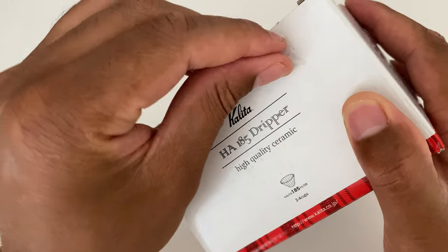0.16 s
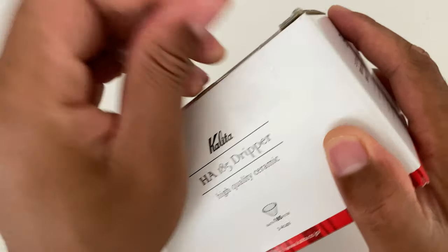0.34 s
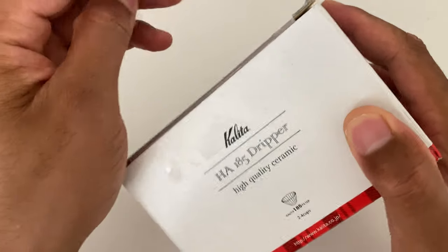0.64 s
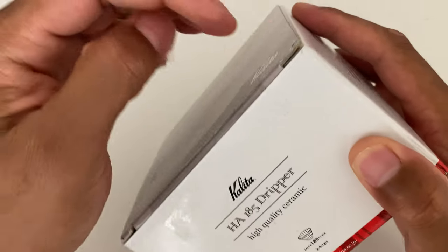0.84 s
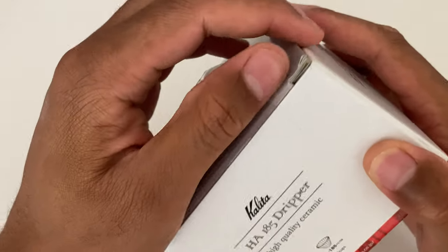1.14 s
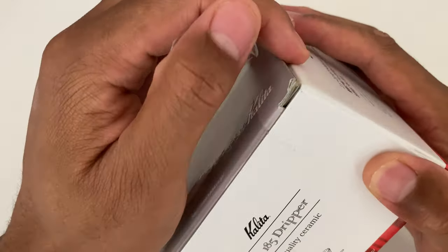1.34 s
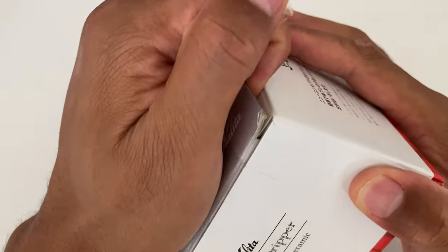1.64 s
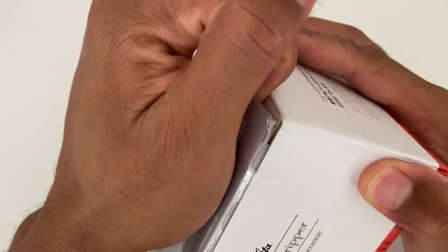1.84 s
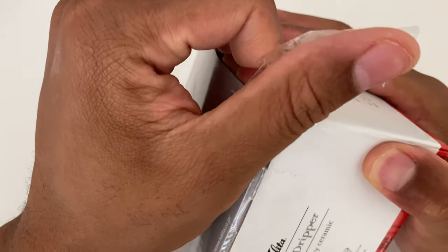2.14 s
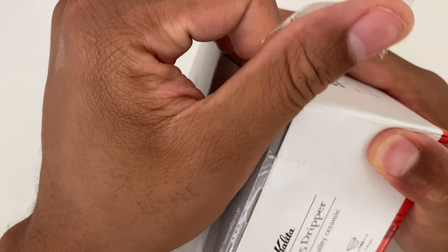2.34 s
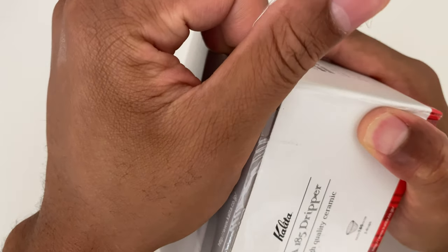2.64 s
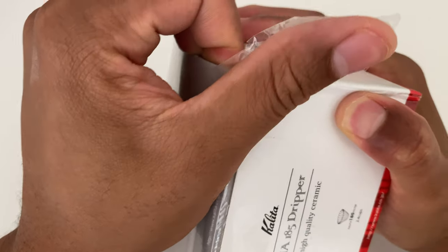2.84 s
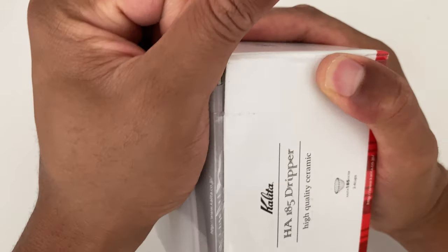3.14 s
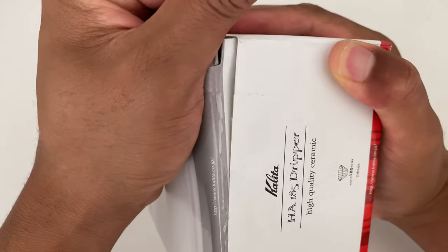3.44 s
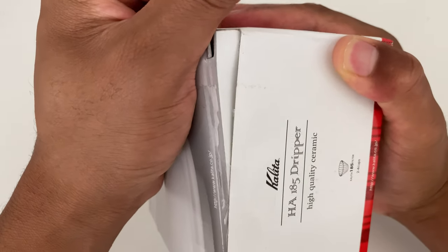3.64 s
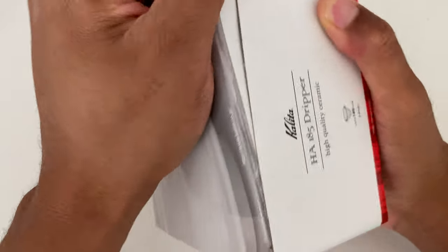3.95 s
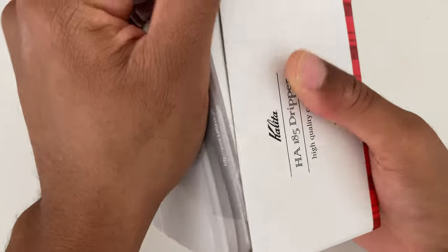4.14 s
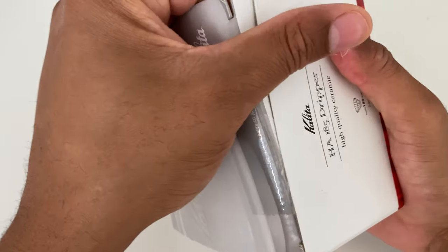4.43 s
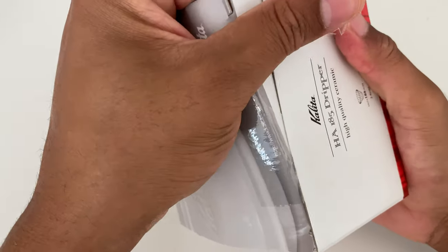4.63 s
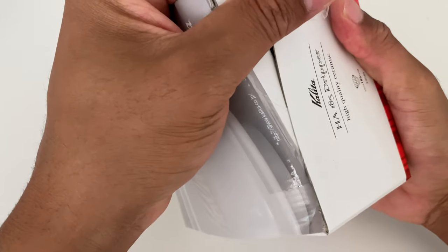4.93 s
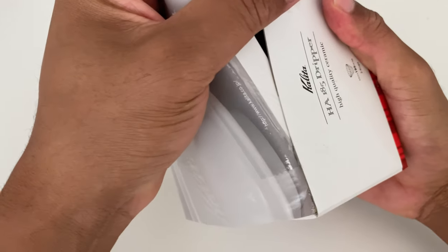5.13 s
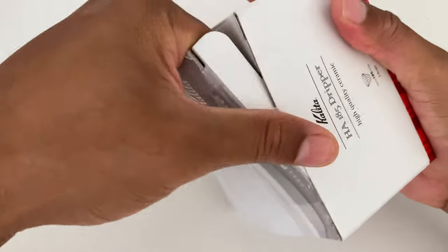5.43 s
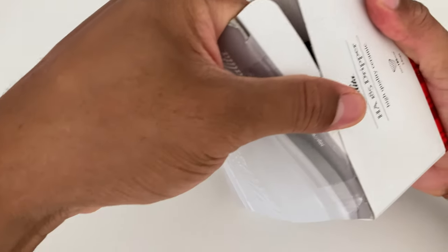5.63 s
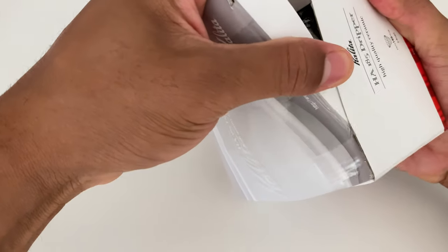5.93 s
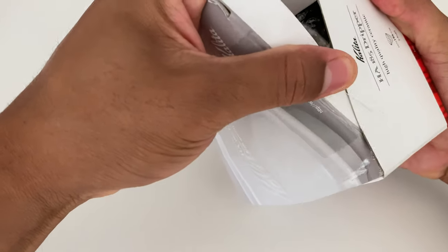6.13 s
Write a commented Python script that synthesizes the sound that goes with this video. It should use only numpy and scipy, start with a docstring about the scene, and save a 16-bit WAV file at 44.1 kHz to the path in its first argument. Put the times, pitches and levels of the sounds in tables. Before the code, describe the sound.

Close stereo phone pickup in a quiet room with faint low air and a light, bright tail. From 0 to 0.5 s, small sticky ticks and a swish of fingers on glossy film lead to a sharp snap at 0.4. A brief film rustle comes near 0.7, then isolated bright snaps at 0.9 and 1.2 among near silence and faint hollow bumps. Around 1.8 to 2.0 muffled cardboard taps gather, with one small ceramic clink near 3 kHz at 1.85. From 2.1 to 3.3 rapid boxy knocks and rubbing grow denser and louder. At 3.36 comes the loudest event, a hard crack and hollow thump, then dry scraping until 3.8, with a knock at 3.75. Knocks at 4.4 and crisp glue crackles from 4.65 to 4.95 end in a strong thump. Sparser pops follow at 5.4, 5.5 and 5.9, with soft rustle fading to about 6.3.

```python
"""Opening a small cardboard box, close to the phone

Hands peel a sticky seal off a small box and pry its flap open, close to a phone in a quiet room.
Slips of the flaps ring the hollow box as decaying modes, and glue and film snap in short bright noise bursts.
Skin rubs the card as stick-slip noise, and a ceramic piece inside clinks once as a cluster of modes around 3 kHz.
A noise tail makes the room, steady low noise its still air, and two microphone ports the stereo.
"""
import sys
import numpy as np
from scipy import signal
from scipy.fft import rfft, irfft
from scipy.io import wavfile
from scipy.ndimage import uniform_filter1d

SR = 44100
rng = np.random.default_rng(int(sys.argv[2]) if len(sys.argv) > 2 else 0)


def transcribe(signal):
    """Save signal, clipped to [-1, 1], as a 16-bit WAV file at the path in sys.argv[1]."""
    frames = np.atleast_2d(signal).T
    limited = np.clip(frames, -1, 1)
    pcm = np.round(limited * 32767).astype(np.int16)
    wavfile.write(sys.argv[1], SR, pcm)


N = 276948

# fingers creeping on the card: (time [s], box rumble [dB], card scrape [dB])
RUB_LEVELS = [(0, -70, -68.5), (.17, -54, -62), (.25, -65.5, -70.5), (.4, -46, -50), (.51, -49.5, -55),
              (.62, -54.5, -58.5), (.72, -61.5, -61), (.89, -63, -80), (1.04, -65, -70),
              (1.09, -55.5, -66.5), (1.3, -52.5, -74), (1.46, -59, -73), (1.52, -43, -50.5),
              (1.57, -51.5, -63), (1.84, -48.5, -61.5), (1.87, -51.5, -54), (2.0, -45, -62),
              (2.14, -48.5, -64.5), (2.39, -46.5, -59.5), (2.55, -52, -61.5), (2.59, -36.5, -57),
              (2.65, -50.5, -75), (2.72, -55, -55), (2.75, -36.5, -53.5), (2.9, -47, -55.5),
              (2.99, -31, -48), (3.08, -46, -61), (3.17, -39, -55.5), (3.3, -48, -66), (3.37, -39.5, -39.5),
              (3.52, -43, -40), (3.6, -41, -47), (3.66, -48, -48), (3.77, -40, -44), (3.85, -52.5, -61),
              (4.01, -39.5, -52), (4.1, -50.5, -64), (4.33, -53, -60), (4.42, -48.5, -54),
              (4.44, -39.5, -47), (4.61, -42.5, -59.5), (4.71, -45.5, -50), (4.96, -39.5, -47),
              (5.1, -42, -52.5), (5.24, -51.5, -63), (5.42, -42.5, -49.5), (5.68, -52, -60.5),
              (5.89, -51, -56.5), (5.91, -38, -50), (5.95, -42, -74), (6.13, -52, -64.5),
              (6.28, -53.5, -54.5)]
# modes of the hollow box: (frequency [Hz], level [dB])
BOX_MODES = [(165, -2), (250, -2), (310, 0), (362, 3), (425, 2), (503, 3), (590, -6), (690, -2), (780, -3),
             (1020, -2), (1150, 0), (1480, -1)]
# spectrum of cracking card: (frequency [Hz], level [dB per Hz])
CRACK_SPECTRUM = [(700, 5), (1200, 4.5), (2000, 1.5), (3000, -4.5), (5000, -14.5), (7000, -21.5)]
# spectrum of the glossy film and its glue: (frequency [Hz], level [dB per Hz])
FILM_SPECTRUM = [(5000, -5.5), (7000, -6.5), (8500, -0.5), (10500, 3), (12500, -1.5), (14000, 3),
                 (15500, -6), (16500, 0.5)]


def undb(db):
    """Gain of a level in dB."""
    return 10 ** (np.asarray(db) / 20)


def unit(x):
    """Scaled to rms 1."""
    return x / np.sqrt(np.mean(x ** 2))


def colour(x, points):
    """Filter by (Hz, dB) points, falling a further 9.8 dB an octave outside them."""
    hz, db = np.transpose(points)
    octave = np.log2(np.maximum(np.fft.rfftfreq(x.shape[-1], 1 / SR), 1))
    below = np.maximum(np.log2(hz[0]) - octave, 0)
    above = np.maximum(octave - np.log2(hz[-1]), 0)
    gain_db = np.interp(octave, np.log2(hz), db) - 9.8 * (below + above)
    return irfft(rfft(x) * undb(gain_db), x.shape[-1])


def walk(rate):
    """Random levels drawn at a rate in Hz with straight slews between them; spread near 1."""
    hold = int(SR / rate)
    steps = np.repeat(rng.standard_normal(N // hold + 1), hold)
    return 1.2 * uniform_filter1d(steps, hold)[:N]


def grains(rate, scatter_db, smooth):
    """Stick-slip: scattered clicks of very uneven size over a share of smooth noise."""
    struck = rng.random(N) < rate / SR
    size = undb(scatter_db * np.minimum(rng.exponential(size=N), 3))
    clicks = struck * rng.standard_normal(N) * size
    return unit(clicks) + smooth * rng.standard_normal(N)


def add(out, s, sound):
    """Mix a sound in at a time in seconds."""
    i = int(s * SR)
    out[..., i:i + sound.shape[-1]] += sound[..., :N - i]


def ring(t, hz, db, t60, rise=1e-4):
    """Sum of modes, each a sine that builds over the rise time and decays 60 dB in its t60."""
    decay = np.exp(-np.log(1000) * t / t60[:, None])
    modes = (1 - np.exp(-t / rise)) * decay * np.sin(2 * np.pi * hz[:, None] * t)
    return (undb(db)[:, None] * modes).sum(axis=0)


def scattered(rate, level_db, db, scatter_db, *same):
    """Rows of events at random times, their size following a level."""
    chance = rng.exponential(size=(200, 2))
    times = np.cumsum(chance[:, 0]) / rate
    peaks_db = level_db(times) + db + scatter_db * np.minimum(chance[:, 1], 2)
    return [(s, peak_db, *same) for s, peak_db in zip(times, peaks_db) if s < N / SR]


def rumble_db(t):
    """Level of the box rumble under the creeping fingers."""
    return np.interp(t, *np.transpose(RUB_LEVELS)[:2])


def rustle_db(t):
    """Level of the hiss on the film."""
    # glue letting go and skin sliding on the glossy film: (time [s], level [dB])
    hiss_levels = [(0, -83), (.12, -74), (.18, -65), (.27, -62.5), (.31, -46), (.36, -48.5), (.41, -43),
                   (.46, -54.5), (.6, -71), (.66, -55.5), (.71, -46.5), (.76, -76), (.87, -88), (.98, -101),
                   (1.1, -66), (1.19, -74), (1.24, -61), (1.3, -64), (1.46, -81), (1.52, -57), (1.57, -75),
                   (1.84, -65), (1.87, -60), (2.06, -74), (2.4, -76), (2.76, -71), (2.92, -69),
                   (3.03, -58.5), (3.18, -68), (3.33, -73), (3.37, -56), (3.5, -67), (3.65, -76),
                   (3.69, -70), (3.72, -53), (3.76, -55), (3.84, -74), (3.95, -67), (4.03, -51.5),
                   (4.11, -63), (4.16, -54.5), (4.23, -66.5), (4.27, -53), (4.32, -70), (4.355, -53),
                   (4.39, -69), (4.44, -49), (4.6, -73), (4.7, -56), (4.82, -60), (4.89, -49), (4.95, -63),
                   (5.0, -61), (5.15, -74), (5.3, -78), (5.42, -45), (5.5, -55), (5.58, -56.5), (5.7, -64),
                   (5.82, -73), (5.89, -65), (5.98, -75), (6.09, -83), (6.16, -67), (6.23, -66),
                   (6.28, -76)]
    return np.interp(t, *np.transpose(hiss_levels))


def still_air():
    """Steady noise of the quiet room, mostly shared by both ports, its level swaying slowly."""
    # spectrum of the still air: (frequency [Hz], level [dB per Hz])
    air_spectrum = [(30, -7.5), (50, 2.5), (75, 11.5), (100, 3), (140, 9.5), (300, -5), (500, -2),
                    (700, -37), (2000, -31), (5000, -50), (10000, -55), (16000, -40)]
    sway_db = 2 * walk(4)
    noise = rng.standard_normal(N) + 0.23 * rng.standard_normal((2, N))
    return unit(colour(noise, air_spectrum) * undb(sway_db)) * undb(-54.5)


def rubbing():
    """Small slips ring the box, scrape and crackle over its wide face, and hiss on the film."""
    # spectrum of skin scraping the card: (frequency [Hz], level [dB per Hz])
    scrape_spectrum = [(1000, 4), (1400, 3.5), (1800, -4), (2200, -3.5), (3200, -7), (5000, -11.5),
                       (7000, -17.5)]
    CRACKLES_PER_S = 70
    CRACKLE_DB, CRACKLE_TOP_DB = -6, -58  # level against the scrape, and its ceiling
    now = np.arange(N) / SR
    scrape_db = np.interp(now, *np.transpose(RUB_LEVELS)[[0, 2]])
    crackle_db = np.minimum(scrape_db + CRACKLE_DB, CRACKLE_TOP_DB)
    jerk_db = 1.2 * walk(40)
    flicker_db = 1.8 * walk(70)

    hz, db = np.transpose(BOX_MODES)
    weight_db = db - 4 * np.log2(hz / 430) ** 2
    body = ring(np.arange(SR // 10) / SR, hz, weight_db, 0.058 * (400 / hz) ** 0.42)

    # a wide source reaches the two ports a little differently
    wide = rng.standard_normal((2, 2, N))
    box = signal.fftconvolve(grains(400, 2.0, 0.7) + 0.79 * wide[0], body[None], axes=1)[:, :N]
    scrape = colour(grains(350, 3.6, 0.3) + 0.9 * wide[1], scrape_spectrum)
    hiss = colour(grains(1200, 3.2, 1.1), FILM_SPECTRUM)
    # fibres cracking
    crackle = colour(grains(CRACKLES_PER_S, 3.0, 0) + 0.2 * wide[1], CRACK_SPECTRUM)

    rub = unit(box) * undb(rumble_db(now) + jerk_db)
    rub = rub + unit(scrape) * undb(scrape_db + jerk_db)
    rub = rub + unit(crackle) * undb(crackle_db)
    return rub + unit(hiss) * undb(rustle_db(now) + jerk_db + flicker_db)


def ticks():
    """Glue and film let go: a sharp snap of noise with a short fizz after it."""
    # snaps at set times: (time [s], peak [dB], lower part relative to it [dB], fizz decay [s])
    set_snaps = [(0.0477, -35, -5, 0.003), (0.096, -40, -22, 0.0018), (0.109, -46, 6, 0.0025),
                 (0.125, -43, -17, 0.0019), (0.171, -35.5, -22, 0.002), (0.181, -29.5, -8.5, 0.0029),
                 (0.308, -27, -18, 0.0027), (0.316, -31.5, -24, 0.002), (0.39, -35, -31, 0.0018),
                 (0.408, -36, -24, 0.0029), (0.413, -14.5, -16.5, 0.0038), (0.424, -33.5, 4.5, 0.011),
                 (0.692, -33.5, -30, 0.0038), (0.713, -32, -19, 0.0024), (0.761, -37.5, -24, 0.0045),
                 (0.7941, -53, -17, 0.002), (0.911, -37, -28, 0.0027), (0.9155, -16, -31, 0.0017),
                 (1.2158, -18.5, -23, 0.0032), (1.225, -23.5, -16, 0.0048), (1.2504, -27, -9, 0.0033),
                 (1.776, -28.5, -0.5, 0.0019), (1.812, -55, 9, 0.0018), (1.845, -45, 10, 0.002),
                 (1.853, -27, 1.5, 0.0063), (1.907, -40, 4, 0.0024), (2.134, -51, -4, 0.0023),
                 (2.17, -43, -2, 0.0014), (2.202, -45, 0, 0.0016), (2.227, -43, -7, 0.002),
                 (2.279, -43, -3, 0.002), (2.3, -49.5, 7, 0.0022), (2.336, -49, 2, 0.002),
                 (2.355, -58, 5, 0.002), (2.373, -52, 11, 0.0022), (2.404, -48.5, -8, 0.0022),
                 (2.453, -47, -5, 0.002), (2.475, -52, -5, 0.0025), (2.5136, -42.5, 7.5, 0.0036),
                 (2.535, -42, -16, 0.0025), (2.5894, -42, 13.5, 0.0042), (2.675, -27.5, -11, 0.0021),
                 (2.734, -40.5, -4, 0.002), (2.769, -49.5, 17, 0.0023), (2.798, -40, -10, 0.002),
                 (2.823, -44, -5, 0.002), (2.86, -52.5, 19, 0.0022), (2.897, -50, 18, 0.0022),
                 (2.93, -39, -6, 0.0023), (2.949, -37, -4, 0.002), (3.022, -32, -3, 0.0014),
                 (3.049, -47, 13, 0.002), (3.088, -43, 0, 0.002), (3.1415, -42.5, 8.5, 0.0039),
                 (3.356, -8, -28, 0.0052), (3.386, -34, -9, 0.002), (3.678, -33, 3, 0.011),
                 (3.747, -38, -6, 0.002), (3.872, -42, -11, 0.0029), (3.91, -40, 6, 0.0024),
                 (4.398, -28, -22, 0.0037), (4.438, -34, -6, 0.0023), (4.4424, -34, 8.5, 0.003),
                 (4.458, -48, -1, 0.002), (4.543, -43.5, 3, 0.0048), (4.571, -46, -4, 0.0025),
                 (4.652, -31, -21, 0.0019), (4.668, -34, -8, 0.0015), (4.692, -27.5, -17, 0.0048),
                 (4.71, -23.5, -24, 0.0032), (4.724, -33, -2, 0.002), (4.772, -38, -10, 0.002),
                 (4.788, -30.5, -1.5, 0.0037), (4.843, -17.5, -24, 0.0012), (4.881, -15.5, -16, 0.0013),
                 (4.91, -38, 8.5, 0.0023), (4.934, -26, -11, 0.0028), (4.939, -25.5, 0.5, 0.0061),
                 (4.957, -20.5, -6, 0.0044), (4.977, -36, -20, 0.002), (5.078, -44, -15, 0.0015),
                 (5.098, -45, -15, 0.0015), (5.139, -39, -17, 0.0015), (5.157, -41, -13, 0.0015),
                 (5.271, -46, -4, 0.0014), (5.378, -31, -34, 0.0017), (5.432, -33, 1, 0.0061),
                 (5.502, -27, -19, 0.0023), (5.58, -29, -11, 0.0037), (5.6406, -35, -31, 0.0022),
                 (5.735, -34.5, -14, 0.0025), (5.843, -37, -24, 0.0029), (5.855, -37, -22, 0.003),
                 (5.892, -35, -17, 0.0037), (5.916, -39, -11, 0.002), (6.079, -52, 7, 0.0027),
                 (6.098, -44.5, -2, 0.0041), (6.2386, -34.5, -4, 0.0032)]
    # further snaps at random times, at least this far above the hiss
    SNAPS_PER_S, SNAP_DB, SNAP_SCATTER_DB = 14, 10, 4
    SNAP_LOW_DB, SNAP_S = -16, .0018
    LEAD_S = .002  # room for the strain ahead of the snap
    low_spectrum = [(1500, 6), (3300, -1), (4200, 0.0), (6500, -11.0)]
    out, t = np.zeros(N), np.arange(SR // 20) / SR - LEAD_S
    further = scattered(SNAPS_PER_S, rustle_db, SNAP_DB, SNAP_SCATTER_DB, SNAP_LOW_DB, SNAP_S)
    for s, peak_db, low_db, length in set_snaps + further:
        snap = np.exp(-np.abs(t) / 0.000099)
        # the glue strains for a moment before it lets go
        fizz = np.exp(-np.where(t < 0, -t / 0.00051, t / max(length, 1e-4)))
        burst = rng.standard_normal(len(t)) * (snap + 0.39 * fizz)
        high, low = colour(burst, FILM_SPECTRUM), colour(burst, low_spectrum)
        both = high / np.abs(high).max() + undb(low_db) * low / np.abs(low).max()
        add(out, max(s - LEAD_S, 0), undb(peak_db) * both)
    return out


def thumps():
    """Slips ring the box modes near a centre; treble crosses the card first and dies first, with a crack and a puff."""
    # slips of the card at set times: (time [s], peak [dB], centre of the ring [Hz],
    # crack relative to the ring [dB], t60 at the centre [s], held between .01 and .1)
    set_slips = [(0.399, -38, 410, -10, 0.071), (0.42, -41, 519, 15, 0.03), (0.479, -35.5, 484, 2.5, 0.14),
                 (1.056, -43, 510, -20, 0.082), (1.068, -42, 490, -23, 0.095), (1.092, -39, 524, -9, 0.2),
                 (1.344, -39, 503, 1, 0.062), (1.369, -36.5, 504, -3, 0.034),
                 (1.437, -41.5, 487, -23, 0.077), (1.513, -29, 508, -23, 0.062),
                 (1.523, -32, 415, 0, 0.041), (1.593, -37, 490, -6, 0.072), (1.773, -28, 440, -6, 0.031),
                 (1.821, -27, 467, -23, 0.028), (1.842, -31, 560, -14, 0.016),
                 (1.852, -28.5, 517, 8.5, 0.057), (1.907, -23, 400, -20, 0.03),
                 (1.923, -29, 347, -28, 0.028), (1.973, -32.5, 490, -26, 0.077),
                 (1.993, -27.5, 392, -8, 0.031), (2.031, -31.5, 395, -4, 0.024), (2.117, -43, 696, 1, 0.02),
                 (2.136, -38.5, 700, -9, 0.026), (2.165, -34, 560, 3.5, 0.028),
                 (2.195, -33.5, 513, -7, 0.042), (2.207, -42, 700, -1, 0.02), (2.226, -39, 500, -1, 0.017),
                 (2.242, -31.5, 398, -16, 0.081), (2.249, -28.5, 405, -5, 0.022),
                 (2.274, -36, 448, 2, 0.04), (2.304, -43, 600, 6, 0.022), (2.325, -34, 400, -11, 0.086),
                 (2.339, -27.5, 410, -10, 0.026), (2.358, -44, 500, 9, 0.025), (2.373, -32, 453, -2, 0.034),
                 (2.39, -31, 400, -17, 0.021), (2.402, -38.5, 418, 3.5, 0.039), (2.449, -42, 450, 7, 0.022),
                 (2.459, -38, 393, 0, 0.026), (2.478, -35.5, 420, 3, 0.059), (2.514, -33.5, 440, -7, 0.027),
                 (2.521, -32, 397, -5, 0.044), (2.537, -29.5, 397, -2.5, 0.025),
                 (2.578, -35, 400, -7, 0.022), (2.588, -22, 450, -10.5, 0.029),
                 (2.606, -33, 465, -17, 0.011), (2.725, -24, 380, -7.5, 0.037),
                 (2.74, -32, 420, -15, 0.037), (2.751, -25.5, 450, -12, 0.038),
                 (2.765, -26.5, 398, -9, 0.055), (2.801, -22, 420, -15, 0.031),
                 (2.856, -23.5, 497, -9.5, 0.041), (2.895, -22, 348, -16, 0.043),
                 (2.932, -19.5, 373, -12.5, 0.024), (2.968, -19, 456, -13, 0.047),
                 (2.98, -27, 376, -7, 0.036), (2.995, -27.5, 520, -13, 0.098),
                 (3.015, -26.5, 447, -18, 0.047), (3.031, -30, 445, -14, 0.046),
                 (3.045, -22, 420, -24, 0.011), (3.065, -27, 405, -13, 0.037),
                 (3.087, -21, 417, -13.5, 0.037), (3.112, -26.5, 373, -15, 0.033),
                 (3.142, -18.5, 500, -26, 0.019), (3.177, -27, 345, -21, 0.025),
                 (3.19, -33, 377, -14, 0.023), (3.217, -29.5, 384, -14, 0.02),
                 (3.232, -34, 380, -19, 0.025), (3.255, -39, 378, -19, 0.03), (3.274, -32, 350, -17, 0.02),
                 (3.294, -32.5, 345, -6.5, 0.022), (3.358, -15.5, 990, 4, 0.042),
                 (3.361, -6, 330, -7.5, 0.023), (3.367, -29, 1110, -5, 0.025), (3.402, -44, 501, -9, 0.028),
                 (3.456, -42, 369, -7, 0.044), (3.5, -29, 368, -5, 0.18), (3.751, -18, 426, -10, 0.017),
                 (3.881, -32.5, 414, -20, 0.017), (3.91, -22.5, 480, -9.5, 0.02),
                 (3.977, -29, 640, -11, 0.031), (4.027, -32, 474, -23, 0.014), (4.058, -47, 368, -18, 0.04),
                 (4.083, -33, 460, -9, 0.061), (4.142, -31, 376, -6.5, 0.046),
                 (4.252, -32.5, 484, -6, 0.019), (4.341, -36, 388, -1.5, 0.055),
                 (4.399, -16.5, 620, -5, 0.028), (4.429, -18.5, 660, -6.5, 0.019),
                 (4.436, -45, 700, -9, 0.03), (4.44, -31, 750, 9, 0.02), (4.446, -27, 690, 4, 0.02),
                 (4.454, -22, 550, -6, 0.046), (4.477, -40, 700, 4, 0.02), (4.499, -25.5, 490, -7.5, 0.029),
                 (4.637, -40, 1150, -2, 0.015), (4.65, -32, 1150, 3.5, 0.034), (4.695, -24, 410, -7, 0.032),
                 (4.734, -22.5, 396, -9, 0.031), (4.75, -34, 800, -10, 0.023),
                 (4.776, -23.5, 340, -21, 0.031), (4.786, -34.5, 1150, 1, 0.02),
                 (4.812, -40, 1020, -5, 0.015), (4.826, -31, 398, -11, 0.03), (4.854, -32, 1480, -1, 0.015),
                 (4.882, -43, 1480, -17, 0.012), (4.89, -37, 1480, -2, 0.015),
                 (4.876, -26, 435, -21, 0.025), (4.912, -34, 1480, -8, 0.017),
                 (4.929, -33, 1490, -5, 0.013), (4.941, -24, 1150, -4, 0.025), (4.959, -12, 470, -10, 0.03),
                 (5.008, -34, 420, -18, 0.029), (5.059, -33, 420, -17, 0.04), (5.08, -34, 420, -9, 0.03),
                 (5.095, -30, 420, -22, 0.036), (5.108, -29, 450, -7, 0.034), (5.128, -37, 450, -15, 0.036),
                 (5.379, -21, 500, -5, 0.059), (5.501, -17.5, 440, -4, 0.02), (5.582, -30, 460, -3, 0.022),
                 (5.704, -39.5, 610, -1, 0.035), (5.729, -37.5, 496, -4, 0.019),
                 (5.806, -33, 364, -10, 0.029), (5.897, -23, 446, -10, 0.025), (5.9, -18, 390, -7, 0.092),
                 (5.908, -18.5, 480, -14, 0.082), (5.917, -23.5, 298, -7, 0.016),
                 (5.9214, -26, 450, -13, 0.014), (5.945, -37, 503, 0, 0.08), (6.051, -40, 396, 4.5, 0.032),
                 (6.254, -35.5, 510, -13, 0.038)]
    # further slips at random times, at least this far above the box rumble
    SLIPS_PER_S, SLIP_DB, SLIP_SCATTER_DB = 14, 8, 2.5
    SLIP_HZ, SLIP_CRACK_DB, SLIP_T60_S = 393, -26, 0.026
    BEND_LAG_S, BEND_POWER = .0028, .7  # lag of a 400 Hz bending wave, and how fast it shrinks with pitch
    BEND_LEAD_S, CRACK_LAG_S = .002, 0.00131  # start ahead of the listed time; crack after that start
    ABOVE_DB, BELOW_DB = 8, 22  # how far modes fall an octave above and below the centre
    FOCUS_S = .045  # a slip listed with a longer t60 keeps to fewer modes
    PUSH_S = 0.0015  # the card takes a moment to start ringing
    PUFF_DB, PUFF_S = -35, .0045  # air squeezed out of the box, against the thump
    PAN_DB, PAN_SCATTER_DB = -.5, 2  # left minus right
    LAG_SCATTER_S = .00012  # a slip elsewhere on the box reaches the right port sooner or later

    out, puffs, t = np.zeros((2, N)), np.zeros(N), np.arange(SR // 8) / SR
    puff = (1 - t / PUFF_S / 2) * t / PUFF_S * np.exp(1 - t / PUFF_S)
    hz, db = np.transpose(BOX_MODES)
    # bending waves in card travel slower at low pitch, so the low modes of a thump come in last
    late = np.maximum(t - BEND_LAG_S * (400 / hz[:, None]) ** BEND_POWER, 0)
    after = np.maximum(t - CRACK_LAG_S, 0)
    crack_shape = (1 - np.exp(-after / 0.0003)) * (np.exp(-after / 0.0015) + 0.18 * np.exp(-after / 0.01))
    further = scattered(SLIPS_PER_S, rumble_db, SLIP_DB, SLIP_SCATTER_DB, SLIP_HZ, SLIP_CRACK_DB, SLIP_T60_S)
    for s, peak_db, centre_hz, crack_db, t60 in set_slips + further:
        chance, noise = rng.standard_normal((3, len(hz))), rng.standard_normal((3, len(t)))
        # the grip moves the modes a little and changes which of them speak
        fall_db = np.where(hz > centre_hz, ABOVE_DB, BELOW_DB) * max(t60 / FOCUS_S, 1)
        weight_db = db - fall_db * np.log2(hz / centre_hz) ** 2 + 2.0 * chance[0]
        mode_hz = hz * (1 + 0.025 * chance[1])
        mode_t60 = np.clip(t60, .01, .1) * (centre_hz / hz) ** 0.51
        body = ring(late, mode_hz, weight_db, mode_t60, PUSH_S)
        # partly shared by the two ports
        crack = colour((noise[0] + 1.3 * noise[1:]) * crack_shape, CRACK_SPECTRUM)
        both = body / np.abs(body).max() + undb(crack_db) * crack / np.abs(crack).max()
        both[1] = np.roll(both[1], int(LAG_SCATTER_S * SR * chance[2, 1]))
        pan_db = np.array([[.5], [-.5]]) * (PAN_DB + PAN_SCATTER_DB * chance[2, 0])
        add(out, s - BEND_LEAD_S, undb(peak_db + pan_db) * both)
        add(puffs, s, undb(peak_db + PUFF_DB) * puff)
    return out, puffs


def clink():
    """The ceramic piece is knocked once and rings in a cluster of modes around 3 kHz, most short, three lingering."""
    # modes of the ceramic piece: (frequency [Hz], level [dB], t60 [s])
    ceramic_modes = [(3040, 0, .05), (3062, -15, .4), (3092, -1, .06), (3120, -15, .4), (3190, -8, .04),
                     (3340, -4, .05), (3400, -4, .06), (3450, -17, .45), (3530, -7, .06), (3800, -12, .03),
                     (4950, -15, .03), (2800, -12, .04)]
    CLINK_S = 1.853
    out = np.zeros(N)
    add(out, CLINK_S, undb(-21) / 3 * ring(np.arange(SR) / SR, *np.transpose(ceramic_modes)))
    return out


def room(x):
    """A fading noise tail, strongest from 1.5 to 6 kHz, different at each port."""
    ROOM_DB, ROOM_T60_S = -14.5, 0.85
    t = np.arange(SR) / SR
    fade = np.exp(-np.log(1000) * t / ROOM_T60_S) * (1 - np.exp(-t / 0.0005))
    tail = rng.standard_normal((2, len(t))) * fade
    tail = colour(tail, [(100, -20.5), (1500, -5.0), (6000, -2.0), (10000, -11.5), (16000, -28)])
    tail = tail / np.sqrt((tail ** 2).sum() / 2)
    return undb(ROOM_DB) * signal.fftconvolve(x, tail, axes=1)[:, :N]


def ports(x):
    """Two ports on the phone body: left is louder below the treble, and the treble comes late on the left."""
    # between the two ports: (frequency [Hz], left minus right [dB], left leads by [radians])
    port_differences = [(40, 6, 0), (150, 8.5, 1.0), (255, 6, 0.4), (420, 5, 0), (730, 7, 0.6),
                        (1400, 6, 1.3), (2525, 5, 2.6), (3900, 6.5, 8.5), (5500, 7.5, 7.5), (5870, 10, 9),
                        (8780, 3, 1.5), (9330, -1, 0.4), (12840, 0, -4), (16200, -0.5, -9.3)]
    hz, pan_db, lead = np.transpose(port_differences)
    f = np.fft.rfftfreq(N, 1 / SR)
    # each port takes half of the difference
    half = undb(np.interp(f, hz, pan_db) / 2) * np.exp(.5j * np.interp(f, hz, lead))
    left, right = rfft(x)
    return irfft([left * half, right / half], N)


def scene():
    """The box in the hands, its room and the still air, at the two ports."""
    CLINK_EXTRA_DB = 2  # further clink sent to the room, on top of its direct level
    air = still_air()
    slips, puffs = thumps()
    ceramic = clink()
    # low end of the handling sounds rolled off below 160 Hz
    card = colour(rubbing() + ticks() + slips, [(70, -22.0), (160, -1.0), (17000, 2.0)])
    box = card + ceramic
    # the clink comes from inside the box, so more of it arrives by way of the room
    wet = room(box + undb(CLINK_EXTRA_DB) * ceramic)
    return ports(box + puffs + wet + air)


def record(dry):
    """The phone rounds the loudest peaks and cuts the top."""
    TOP_HZ = 16600
    rounded = 1.5 * np.tanh(dry / 1.5)
    low_pass = signal.ellip(8, .2, 70, TOP_HZ, fs=SR, output="sos")
    return signal.sosfilt(low_pass, rounded)


dry = scene()
out = record(dry)
transcribe(out)
```